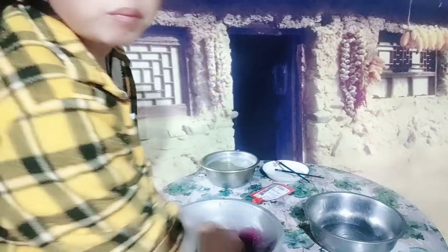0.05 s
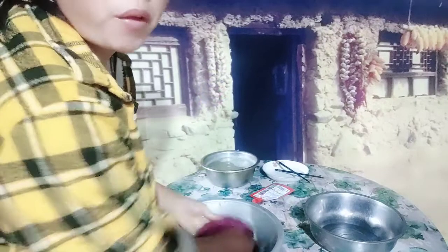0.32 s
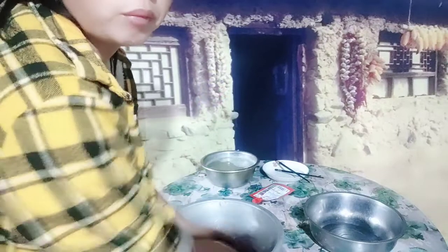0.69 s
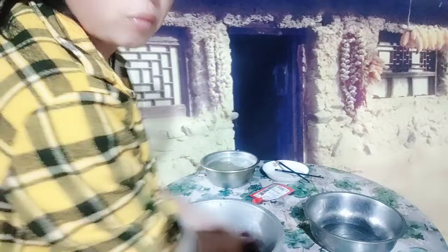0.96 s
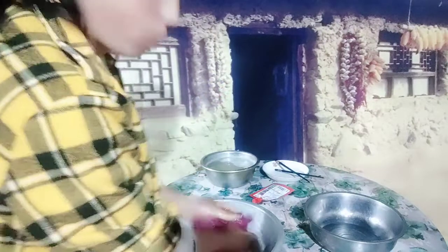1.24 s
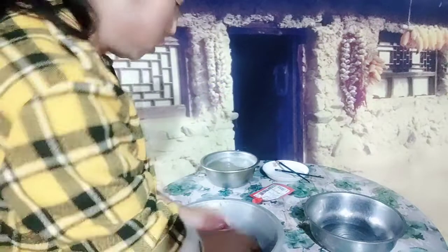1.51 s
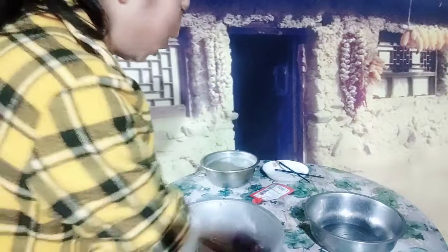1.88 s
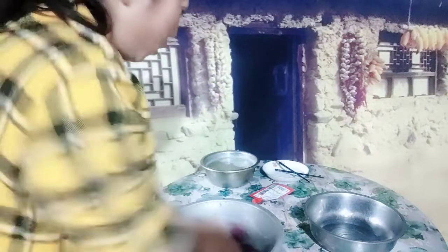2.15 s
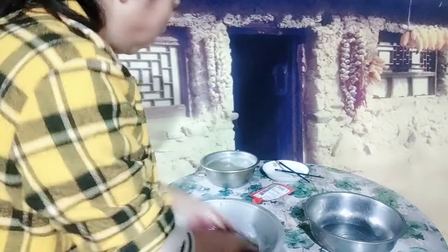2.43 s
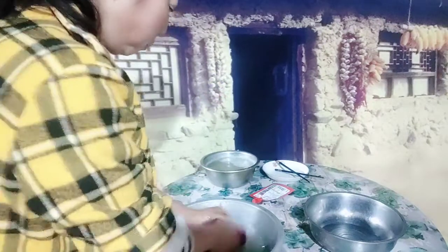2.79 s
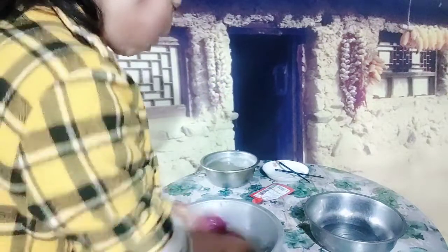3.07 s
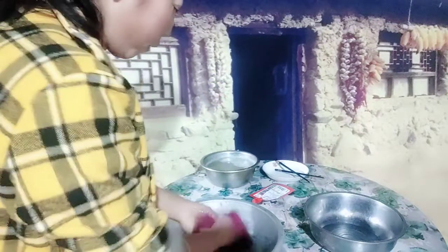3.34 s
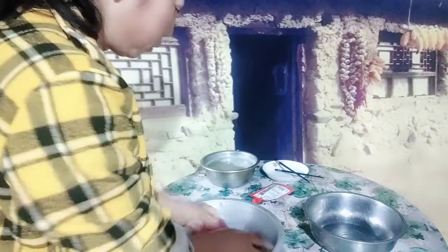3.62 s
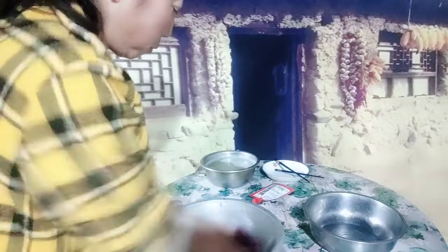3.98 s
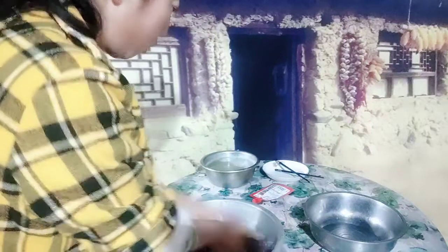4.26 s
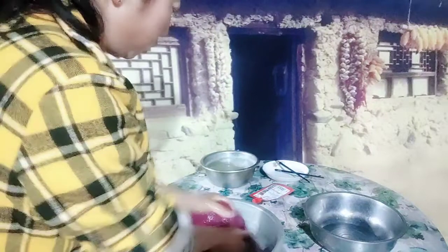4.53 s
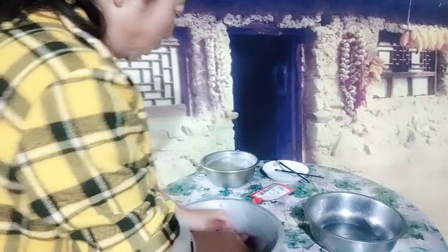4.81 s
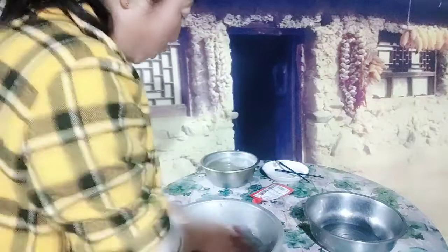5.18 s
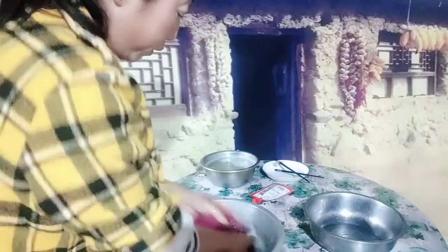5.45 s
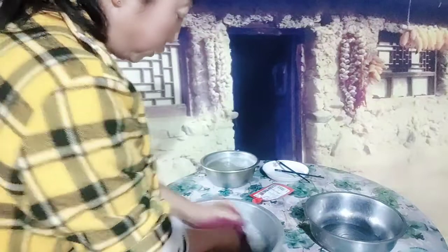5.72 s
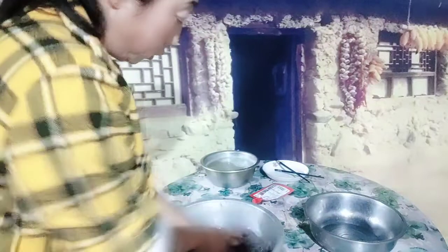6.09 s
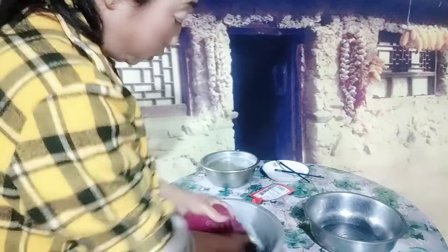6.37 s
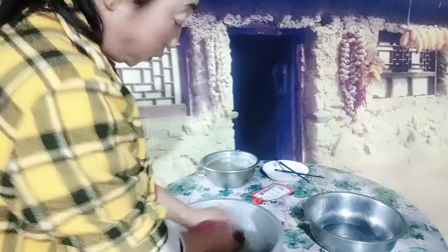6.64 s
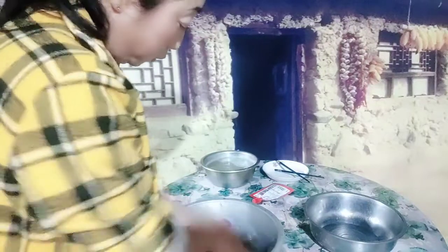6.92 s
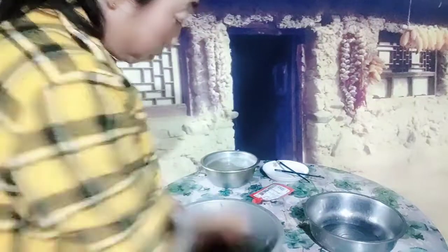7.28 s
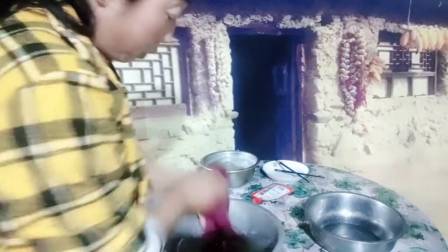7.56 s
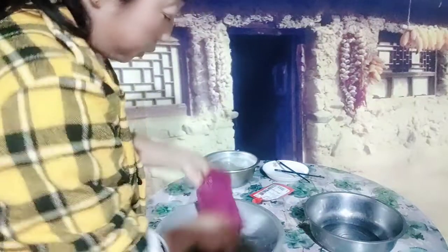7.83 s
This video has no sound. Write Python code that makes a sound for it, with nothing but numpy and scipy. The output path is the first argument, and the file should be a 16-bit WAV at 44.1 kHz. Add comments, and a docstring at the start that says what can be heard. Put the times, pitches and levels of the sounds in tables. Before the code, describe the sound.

A hand washes a wet cloth in a steel basin of water. Uneven pushes slosh and gulp, squeezes send out a crackling spray, and occasional slaps splash sharply. The hand pauses briefly a little before halfway, works on, and near the end lifts the cloth out dripping. The basin rings slightly with the water, and a small, lively room answers over a faint low rumble.

```python
"""A hand works a wet cloth in a steel basin of water. From the start, pushes slosh and gulp, squeezes
spray, slaps splash and now and then the cloth drags over the floor. Just after 3 s the hand pauses briefly,
then works on, and past 7 s it lifts the cloth out dripping. All the water sound is ringing air bubbles:
big ones gulp, middling ones slosh, tiny ones crackle. Throughout, the basin and one low room resonance
ring a little with them, and the small, lively room answers over a faint low rumble."""
import sys
import numpy as np
from scipy import signal
from scipy.fft import rfft, irfft
from scipy.io import wavfile

SR = 44100
rng = np.random.default_rng(int(sys.argv[2]) if len(sys.argv) > 2 else 0)


def to_wav(s):
    """Save 16-bit WAV."""
    ch = np.atleast_2d(s).T  # columns
    pcm = np.round(np.clip(ch, -1, 1) * 32767)  # PCM
    wavfile.write(sys.argv[1], SR, pcm.astype(np.int16))


N = 352800
TIME = np.arange(N) / SR

# Pushes of the hand. Cue levels here and below are set before each layer's fader.
# (time [s], length [s], big bubbles [dB], middling bubbles [dB], gurgle pitch [Hz])
PUSHES = [(-.05, 0.39, -68.5, -55, 596), (0.374, 0.1, -73.5, -56.5, 700), (0.518, 0.15, -63.5, -53.5, 510),
          (0.716, 0.072, -64.5, -55.5, 780), (0.856, 0.21, -61.5, -55, 460), (1.043, 0.2, -62.5, -53, 464),
          (1.246, 0.25, -67, -52.5, 596), (1.5, 0.048, -54.5, -49.5, 470), (1.594, 0.33, -64.5, -63.5, 438),
          (2.131, 0.081, -61.5, -56, 560), (2.246, 0.2, -60.5, -57, 380), (2.404, 0.24, -64.5, -55.5, 556),
          (2.561, 0.082, -53, -45.5, 745), (2.686, 0.17, -58.5, -51.5, 620), (2.862, 0.17, -69, -56, 590),
          (3.49, 0.084, -68.5, -60.5, 805), (3.601, 0.056, -52, -49, 617), (3.731, 0.27, -60, -59, 378),
          (4.046, 0.13, -61, -50, 910), (4.185, 0.061, -53.5, -48.5, 584), (4.278, 0.23, -59.5, -54, 610),
          (4.528, 0.21, -82, -50, 1150), (4.633, 0.12, -55.5, -49, 580), (4.808, 0.2, -60, -54, 340),
          (5.047, 0.16, -85, -56, 1390), (5.185, 0.16, -72, -55, 1020), (5.272, 0.26, -60, -58, 504),
          (5.574, 0.088, -54.5, -50.5, 533), (5.711, 0.11, -56.5, -48, 1120),
          (5.858, 0.11, -56, -51.5, 545), (6.026, 0.31, -59.5, -52.5, 360), (6.381, 0.3, -63.5, -49.5, 680),
          (6.735, 0.13, -58, -55.5, 480), (6.938, 0.13, -68, -57.5, 617), (7.107, 0.075, -65.5, -55.5, 860),
          (7.322, 0.26, -66, -62.5, 700)]
BIG, MIDDLING = 2, 3  # the two level columns
def push_envelope(column, sag_db=-4.5):
    """Each push sends a slosh across the basin: it builds, weakens as it travels, and settles."""
    return flow([(row[0], row[1], row[column], sag_db) for row in PUSHES], rise_s=0.017, fall_s=0.032)


def gurgle(s, hz, hump_db=2.0, hump_octaves=1.0, low_cut_db_per_octave=20, octaves_per_s=2.9):
    """Emphasis in dB that sweeps up through each push: trapped bubbles shrink as the hand comes up."""
    start, length, _, _, gurgle_hz = np.transpose(PUSHES)
    push = np.maximum(np.searchsorted(start, s) - 1, 0)
    climb = octaves_per_s * np.minimum(s - start[push], length[push])
    octaves = np.log2(hz / gurgle_hz[push]) - climb
    hump = hump_db * np.exp(-(octaves / hump_octaves) ** 2)
    return hump + low_cut_db_per_octave * np.minimum(octaves, 0)


# Tone of the big and of the middling bubbles: (pitch [Hz], relative density [dB per Hz])
GULP_TONE = [(265, 1), (315, -5), (375, -2), (460, 1.5), (640, 2), (820, -7)]
SLOSH_TONE = [(800, 1), (1000, -0.76), (1500, -0.043), (2000, 1), (2330, 0.12), (2850, -1.7)]
def sloshing():
    """The hand stirs air under: big bubbles give the gulp, middling ones the body of the slosh."""
    gulps = cloud(push_envelope(BIG), GULP_TONE, per_s=1000, crowding=.4, spread_db=2.0,
                  cycles=1.8, rise=0.0067, count=8000, gurgling=0.73)
    body = cloud(push_envelope(MIDDLING), SLOSH_TONE, per_s=3300, crowding=.75, spread_db=4.0,
                 cycles=2.76, rise=0.011, count=32000, gurgling=0.55)
    return amp(-5.0) * gulps + amp(-3.5) * body


# Squeezes and lifts of the cloth: (time [s], length [s], level [dB], swell from start to end [dB])
SQUEEZES = [(-.05, 0.29, -56, 8), (.39, 0.11, -59, -17), (.52, .11, -54.5, -8), (.66, 0.38, -58.5, 3),
            (1.178, 0.25, -47.5, 3.5), (1.47, 0.073, -50.5, -3.5), (1.65, 0.2, -62, 1.5),
            (2.04, 0.047, -54, -10), (2.15, 0.73, -54.5, 1.5), (2.57, 0.21, -50, -5.5),
            (2.78, 0.058, -68, -4), (2.91, 0.13, -53, -6.5), (3.35, 0.037, -54.5, -3),
            (3.53, 0.062, -56, 2), (3.6, 0.065, -44, -1), (3.68, 0.12, -58, 9), (3.94, 0.11, -64, 12),
            (4.04, 0.16, -49, -8), (4.2, 0.48, -67, -11.5), (4.47, 0.24, -47.5, -1.5),
            (4.72, 0.23, -49.5, -6.5), (5.11, 0.21, -51.5, -6), (5.49, 0.087, -54, -1),
            (5.61, 0.34, -51, -1), (6, 0.36, -57.5, 2), (6.39, 0.32, -51, -4.5), (6.58, 0.069, -42, -3),
            (6.75, 0.15, -53, -10.5), (6.99, 0.033, -57.5, -3), (7.35, 0.12, -60.5, 12.5),
            (7.515, 0.04, -48.5, -3), (7.925, 0.035, -54.5, -16)]
# Tone of the crackle and of the droplets: (pitch [Hz], relative density [dB per Hz])
CRACKLE_TONE = [(2700, 1.5), (3900, 2.5), (4800, 0), (5800, 3.5), (7000, -2.5), (8000, -4.5), (9500, -41)]
DROPLET_TONE = [(2200, 3), (6500, 0.5), (8000, 0), (10500, -5), (12000, -14)]
def spraying(slosh_spray_db=-7, clump_db=5.5):
    """Water runs off the cloth and flies off each slosh: tiny bubbles crackle in clumps, drops plink."""
    runoff = flow(SQUEEZES, rise_s=0.0034, fall_s=0.031)
    level = np.hypot(runoff, amp(slosh_spray_db) * push_envelope(MIDDLING))
    clumps = amp(clump_db * wander(per_s=140))
    crackle = cloud(level * clumps, CRACKLE_TONE, per_s=5400, crowding=0.62, spread_db=2.0,
                    cycles=2.46, rise=0.011, count=56000)
    strays = stray_snaps(level)
    droplets = cloud(level ** 0.77, DROPLET_TONE, per_s=90, crowding=.4, spread_db=1.5,
                     cycles=6.7, rise=0.0067, count=1200)
    return amp(-4.5) * crackle + amp(-22) * droplets + strays + fizzing(level, clumps)


# Spits from the squeezed cloth: (time [s], level [dB], decay [s])
SPITS = [(.469, -55, 0.011), (1.35, -57, 0.13), (1.652, -54.5, 0.015), (2.047, -57, .01),
         (2.164, -58, 0.021), (2.574, -45.5, 0.023), (2.709, -51, 0.034), (2.913, -48.5, 0.016),
         (3.364, -65, 0.01), (3.635, -58, 0.025), (4.08, -56.5, 0.033), (4.59, -60, 0.15),
         (4.752, -51, 0.015), (4.83, -62.5, 0.059), (4.938, -61, 0.014), (5.19, -56, 0.045),
         (5.632, -53, 0.057), (5.745, -54.5, 0.077), (6.252, -52.5, 0.012), (6.57, -59.5, 0.038),
         (6.633, -39.5, 0.0059), (6.76, -57, 0.02), (7.52, -60.5, 0.053), (7.91, -65.5, 0.04)]
# Tone of the finest bubbles: (pitch [Hz], relative density [dB per Hz])
FIZZ_TONE = [(7500, -11), (9000, 13.5), (11000, 10), (13500, -0.5), (15000, -23.5)]
def fizzing(spray_level, clumps):
    """The finest bubbles add a bright top when the water runs hard or spits."""
    hard_flow = amp(-15) * spray_level * (spray_level / spray_level.max()) ** 1.2
    level = hard_flow + amp(5.0) * bursts(SPITS)
    return cloud(level * clumps, FIZZ_TONE, per_s=2200, crowding=.45, spread_db=3.5,
                 cycles=2.4, rise=0.01, count=30000)


# The water slaps and breaks: (time [s], level [dB], decay [s])
SLAPS = [(.524, -46.5, 0.018), (1.179, -47.5, 0.037), (1.521, -44.5, 0.01), (2.574, -55, 0.01),
         (2.709, -40.5, 0.053), (2.905, -46, 0.014), (3.603, -37.5, 0.031), (3.638, -35.5, 0.025),
         (4.654, -40.5, 0.038), (5.748, -49, 0.12), (6.596, -43.5, 0.024), (6.633, -38.5, 0.019),
         (6.753, -47, 0.047), (7.516, -47, 0.076), (7.695, -55, 0.027), (7.848, -62, 0.045),
         (7.907, -55.5, 0.014)]
# Tone of a splash: (pitch [Hz], relative density [dB per Hz])
SPLASH_TONE = [(450, -5.5), (700, -5), (1400, 0), (2300, 20.5), (3000, 3.5), (4000, 16), (6200, 13.5),
               (8000, 13.5), (11000, 3)]
def splashing():
    """Each slap cracks and throws a dense, brief shower of bubbles of all sizes."""
    return amp(-3.5) * cloud(bursts(SLAPS, crack=1.3), SPLASH_TONE, per_s=10000, crowding=0.6,
                             spread_db=-0.5, cycles=1.97, rise=0.0074, count=72000)


# The most prominent single drops and bubbles: (time [s], pitch [Hz], level [dB])
PLOPS = [(.172, 6460, -37.5), (.177, 6100, -33), (.182, 6400, -40), (.469, 5760, -31), (.478, 2770, -35.5),
         (0.817, 2460, -41), (.886, 6200, -33), (.925, 3130, -42), (1.013, 6850, -37.5), (1.084, 1590, -48),
         (1.278, 2480, -36.5), (1.188, 6250, -32), (1.216, 4900, -34), (1.403, 5680, -26.5),
         (1.524, 2650, -36), (1.838, 5800, -30.5), (2.028, 2050, -44), (2.151, 7500, -34),
         (2.318, 1310, -38.5), (2.322, 2000, -43.5), (2.577, 1290, -46), (2.73, 6930, -21),
         (2.798, 680, -40.5), (3.316, 5740, -50.5), (3.336, 1570, -53.5), (3.337, 1036, -54.5),
         (3.339, 3600, -46.5), (3.364, 8200, -32), (3.366, 3930, -43.5), (3.407, 1464, -44),
         (3.411, 940, -57.5), (3.442, 5160, -39), (3.486, 1790, -49), (3.643, 5750, -23),
         (3.801, 8030, -32.5), (3.918, 3900, -48), (4.073, 2140, -35.5), (4.314, 2150, -33.5),
         (4.501, 5900, -31), (4.599, 5800, -28.5), (4.979, 2430, -41), (5.164, 5400, -28),
         (5.372, 910, -35), (5.493, 5830, -32), (5.617, 7160, -26.5), (6.16, 630, -43.5),
         (6.253, 7860, -30), (6.394, 5900, -36.5), (6.598, 4300, -25.5), (6.855, 7520, -30),
         (7.007, 4840, -44.5), (7.153, 1027, -42), (7.257, 1620, -43.5), (7.265, 2670, -51),
         (7.332, 1160, -43.5), (7.342, 7750, -46.5), (7.36, 7900, -38), (7.387, 2240, -59.5),
         (7.437, 1350, -50.5), (7.487, 3180, -44), (7.522, 6600, -30.5), (7.545, 2520, -42),
         (7.695, 4280, -44), (7.71, 2990, -45), (7.765, 2180, -54), (7.826, 4970, -39.5),
         (7.852, 2970, -46), (7.909, 2420, -51), (7.922, 2240, -63)]
def plopping(followers=2, follower_db=-9.5, gap_s=0.0066, scatter_octaves=0.18):
    """Single bubbles chirp, trailed by weaker ones; small, gentle ones ring for more cycles."""
    s, hz, db = np.transpose(PLOPS)
    timing, detune, damping = rng.uniform(-0.82, 1, (len(s), followers, 3)).T
    accent_db = db - db.mean()
    cycles = 3.13 * (hz / 2000) ** 0.23 * amp(-.17 * accent_db) * (1 + 0.038 * damping[0])
    out = bubbles(s, hz, amp(db - 1.9), cycles, rise=0.0053)
    for k in range(followers):
        s = s + gap_s * (1 + .6 * timing[k])
        peak = amp(db + follower_db - 1.4 * k - .5 * accent_db)  # hard plops stand further above these
        out += bubbles(s, hz * 2 ** (scatter_octaves * detune[k]), peak, cycles, rise=0.01)
    return out


# Accents from snapping water film: (time [s], pitch [Hz], level [dB])
FILM_SNAPS = [(.12, 5600, -37), (.4, 7100, -40), (.541, 4100, -36), (.548, 5000, -36), (.68, 6500, -38),
              (1.136, 7600, -39), (1.382, 6100, -33), (1.498, 5600, -33), (1.6515, 7400, -36),
              (1.7315, 6700, -38), (1.83, 6050, -38), (1.918, 7700, -37), (2.014, 6700, -46),
              (2.047, 5700, -38), (2.166, 7400, -39), (2.1915, 5600, -36), (2.5745, 5500, -29),
              (2.7245, 6500, -33), (2.7995, 5900, -33), (2.907, 4200, -33), (2.924, 5500, -33),
              (2.929, 7500, -32), (3.535, 5700, -42), (3.622, 5700, -29), (4.04, 5400, -37),
              (4.105, 5900, -31), (4.5915, 6500, -33), (4.683, 6200, -31), (4.7535, 7500, -32),
              (5.3055, 7000, -36), (5.419, 6500, -38), (5.635, 6800, -34), (5.651, 6800, -26),
              (5.7975, 5600, -28), (5.8925, 5200, -28.5), (6.0955, 5850, -37), (6.633, 5800, -25),
              (6.754, 4000, -36), (7.148, 5600, -42), (7.577, 6000, -35)]
def film_snapping():
    """Films of water break on the cloth and the steel with a sharp tick."""
    s, hz, db = np.transpose(FILM_SNAPS)
    return snaps(s, hz, amp(db))


def stray_snaps(spray_level, count=200, boost_db=5, spread_db=3, centre_hz=5820, octaves=0.43):
    """More films break at random, riding the level of the spray."""
    when, luck, pitch = rng.random((count, 3)).T
    accent_db = boost_db - spread_db * np.log(np.maximum(luck, .2))
    level = spray_level[(when * N).astype(int)] * amp(accent_db)
    return snaps(when * N / SR, centre_hz * 2 ** (octaves * (2 * pitch - 1)), level)


# The cloth is pushed under: (time [s], level [dB], decay [s])
PLUNGES = [(0, -65, 0.012), (1.68, -69.5, 0.068), (2.26, -74, 0.2), (3.82, -60.5, 0.045),
           (4.84, -59, 0.097), (6.15, -65, 0.051), (6.82, -69.5, 0.087)]
# Tone of the air pockets: (pitch [Hz], relative density [dB per Hz])
POCKET_TONE = [(130, -26), (170, -11), (220, -0.5), (310, 2.5), (420, 5.5)]
def plunging():
    """The sinking cloth traps large pockets of air that ring deep and short."""
    return cloud(bursts(PLUNGES), POCKET_TONE, per_s=600, crowding=0.38, spread_db=2.0,
                 cycles=1.18, rise=0.035, count=6000)


# Drags over the basin floor: (time [s], length [s], level [dB], sag [dB], pitch [Hz])
DRAGS = [(1.687, 0.47, -72, -15, 152), (3.799, 0.37, -76, -11, 108), (6.783, 0.176, -79.5, -1, 102)]
def dragging(start, length, db, sag_db, floor_hz, slips=40, slips_per_s=51):
    """The cloth sticks and slips; each slip thumps the dull floor, voiced as a low, damped bubble."""
    jitter, force, pitch = rng.uniform(-1, 1, (3, slips))
    s = start + (np.arange(slips) + 0.36 * jitter) / slips_per_s
    envelope = stroke(start, length, db, sag_db, rise_s=.015, fall_s=0.031)
    peak = np.interp(s, TIME, envelope) * amp(5.8 * force)
    hz = floor_hz * (1 + .14 * pitch)
    return amp(3.5) * bubbles(s, hz, peak, cycles=np.full(slips, 1.5), rise=-0.016)


# Resonances of the water-damped steel basin, plus a low room resonance near 310 Hz:
# (pitch [Hz], bandwidth [Hz], gain [dB])
RESONANCES = [(442, 50, -13), (629, 17, -4.5), (670, 37, -13), (950, 47, -14), (1096, 9.8, -20),
              (1487, 23, -7), (1550, 25, -8), (2275, 85, -12.5), (310.4, 19, -0.5)]
def resonating(water, drift_share=0.0042):
    """The basin and one low room resonance ring with the water, all drifting slightly in pitch."""
    clock = np.cumsum(1 + drift_share * wander(per_s=13)) / SR
    out = water
    for hz, width, db in RESONANCES:
        carrier = np.exp(2j * np.pi * hz * clock)
        pole = np.exp(-np.pi * width / SR)
        ringing = signal.lfilter([1 - pole], [1, -pole], water / carrier + 1e-18)
        out = out + 2 * amp(db) * (carrier * ringing).real
    return out


# Early reflections off nearby surfaces: (delay [s], level [dB])
ECHOES = [(.0017, -9), (.0036, -14), (.0056, -14), (.0083, -13.5), (0.013, -23.5)]
# Reverb time: (frequency [Hz], time to fall 60 dB [s])
TAIL_T60 = [(150, 0.29), (600, 0.39), (2000, 0.355), (5500, 0.41), (9000, 0.35), (15000, .28)]
# Reverb tone: (frequency [Hz], level [dB])
TAIL_TONE = [(150, -16), (800, -1.5), (2500, -2.5), (6000, -1), (12000, 0.5)]
def reflections(onset_s=0.0035):
    """A few near echoes and a short diffuse tail, for one place in the basin."""
    t = TIME[:SR * 3 // 4]
    hz, frame_s, noise = signal.stft(rng.standard_normal(len(t)), SR, nperseg=256)
    t60 = read(TAIL_T60, hz)[:, None]
    fade = np.exp(-np.log(1000) * frame_s / t60)
    fade *= np.sqrt(2 * np.log(1000) / (t60 * SR))  # long and short tails carry equal energy
    tail = noise * fade * amp(read(TAIL_TONE, hz))[:, None]
    response = signal.istft(tail, SR, nperseg=256)[1][:len(t)]
    response *= 1 - np.exp(-t / onset_s)
    for delay, db in ECHOES:
        response[round(delay * rng.uniform(.85, 1.15) * SR)] += rng.choice([-1, 1]) * amp(db)
    return response


def room(direct, places=7, moves_per_s=9):
    """The splashing wanders about the basin, so one pattern of reflections crossfades into the next."""
    out = direct
    for k in range(places):
        visit = np.minimum((moves_per_s * TIME - k) % places, 2)
        send = direct * np.sin(np.pi * visit / 2)
        out = out + signal.oaconvolve(send, reflections())[:N]
    return out


# The noise bed: (frequency [Hz], relative density [dB per Hz])
ROOM_TONE = [(15, 9), (30, -1), (60, -7.5), (105, -12.5), (150, -20.5), (300, -34.5), (1000, -50),
             (6000, -40), (15000, -23.5)]
def room_tone():
    """Faint steady rumble and hiss."""
    noise = colour(rng.standard_normal(N), ROOM_TONE)
    return amp(-67.5) * noise / noise.std()


def bubbles(s, hz, peak, cycles, rise):
    """Each bubble swells softly, decays over its cycles and glides by the share rise per decay time."""
    out, decay_s = np.zeros(N), cycles / hz
    for group in np.array_split(np.argsort(decay_s), max(len(s) // 400, 1)):  # batches of like length
        step = np.arange(int(6.5 * decay_s[group].max() * SR))
        turns = hz[group, None] * step / SR
        age = turns / cycles[group, None]
        envelope = 2.2 * (1 - np.exp(-4 * age)) ** 2 * np.exp(-age)  # peaks at 1
        phase = 2 * np.pi * turns * (1 + rise * (age - 1) / 2)  # a surfacing bubble climbs in pitch
        wave = peak[group, None] * envelope * np.sin(phase)
        samples = (s[group, None] * SR).astype(int) + step
        out += np.bincount(samples.ravel(), wave.ravel(), N)[:N]
    return out


def cloud(level, tone, per_s, crowding, spread_db, cycles, rise, count, gurgling=0):
    """Bubbles drawn from count candidates follow level: stronger motion makes more and louder ones."""
    when, keep, pitch, luck, damping = rng.random((count, 5)).T
    drive = (level / level.max())[(when * N).astype(int)]
    density = np.minimum(per_s * drive ** crowding * N / SR / count, 1)
    born = keep < density
    s = when[born] * N / SR
    band = np.linspace(tone[0][0], tone[-1][0], num=16)
    hz = band[0] + pitch[born] * (band[-1] - band[0])
    # the gurgle shifts energy between pitches and keeps the total
    total = np.linalg.norm(amp(read(tone, band) + gurgling * gurgle(s[:, None], band)), axis=1)
    share = np.sqrt(hz) * amp(read(tone, hz) + gurgling * gurgle(s, hz)) / total
    accent_db = spread_db * np.minimum(-np.log(1 - luck[born]), 3.5)
    peak = drive[born] / np.sqrt(density[born]) * share * amp(accent_db)
    calm = np.maximum(drive[born], .05) ** -.15  # bubbles ring longer in calm water
    ring_cycles = cycles * calm * 2 ** (2 * damping[born] - 1)
    out = bubbles(s, hz, peak / np.sqrt(calm), ring_cycles, rise)
    return out * np.linalg.norm(level) / np.linalg.norm(out)


def snaps(s, hz, level, count=5, spread_s=0.00098, spread_octaves=0.41):
    """Each snap is a knot of tiny bubbles, close in time and wide in pitch."""
    pitch, lag = rng.random((len(s), count, 2)).T
    out = np.zeros(N)
    for k in range(count):
        octaves = spread_octaves * (2 * (k + pitch[k]) / count - 1)
        out += bubbles(s + spread_s * lag[k], hz * 2 ** octaves, amp(-5.5) * level,
                       cycles=np.full(len(s), 1.7), rise=0)
    return out


def flow(rows, rise_s, fall_s, surge_db=0.5, rise_share=.14):
    """Envelope of overlapping strokes of water, moving in slight, uneven surges."""
    surges = amp(surge_db * wander(per_s=22))
    power = np.zeros(N)
    for s, length, db, swell_db in rows:
        lead = rise_share * length / 2  # long movements build more slowly
        power += stroke(s - lead, length + lead, db, swell_db, rise_s + 2 * lead, fall_s) ** 2
    return np.sqrt(power) * surges


def stroke(start, length, db, swell_db, rise_s, fall_s):
    """Envelope of one movement: attack, a hold that swells or sags, release."""
    out = np.zeros(N)
    part = out[max(round(start * SR), 0):][:SR]
    t = TIME[:len(part)] - min(start, 0)
    attack = np.minimum(t / rise_s, 1)
    hold = amp(db + swell_db * (np.minimum(t / length, 1) - .5))
    release = np.exp(-np.maximum(t - length, 0) / fall_s)
    part += attack * hold * release
    return out


def bursts(rows, crack=0, crack_s=0.0031):
    """Envelope of sudden hits that die away; crack adds a transient at first contact."""
    power = np.zeros(N)
    for s, db, decay in rows:
        part = power[round(s * SR):][:SR]
        t = TIME[:len(part)]
        part += (amp(db) * (np.exp(-t / decay) + crack * np.exp(-t / crack_s))) ** 2
    return np.sqrt(power)


def wander(per_s):
    """A modulator between -1 and 1 that heads for a new random value per_s times a second."""
    return np.interp(TIME * per_s, np.arange(4000), rng.uniform(-1, 1, 4000))


def amp(db):
    """Decibels to gain."""
    return 10 ** (np.asarray(db) / 20)


def read(points, hz):
    """Joins (frequency [Hz], value) points on a log-frequency axis."""
    point_hz, value = np.transpose(points)
    return np.interp(np.log(hz + 1), np.log(point_hz + 1), value)


def colour(x, points):
    """A smooth EQ through (frequency [Hz], gain [dB]) points."""
    return irfft(rfft(x) * amp(read(points, np.fft.rfftfreq(N, 1 / SR))), N)


def scene():
    """Water and cloth play through the resonances and the reverb, over the room tone."""
    water = sloshing() + plunging() + spraying() + splashing() + plopping() + film_snapping()
    cloth = sum(dragging(*row) for row in DRAGS)
    return (room(resonating(water + cloth)) + room_tone())[None]


# Microphone colour, soft on top: (frequency [Hz], gain [dB])
MICROPHONE_EQ = [(100, -1), (230, -3), (500, 1), (2000, -1), (7000, 1), (9000, -8.5), (11500, -20),
                 (15000, -19.5)]
def record(dry):
    """Microphone colour, then a steep low-pass at 15.4 kHz."""
    low_pass = signal.firwin(511, 15400, window=("kaiser", 9), fs=SR)
    return signal.oaconvolve(colour(dry[0], MICROPHONE_EQ), low_pass, "same")[None]


dry = scene()
out = record(dry)
to_wav(out)
```